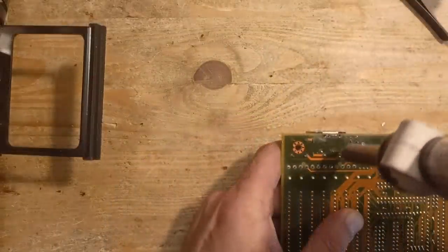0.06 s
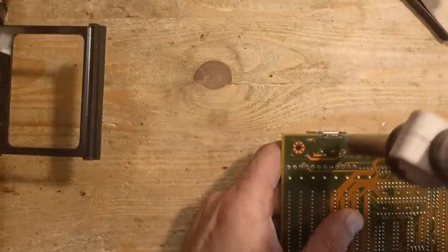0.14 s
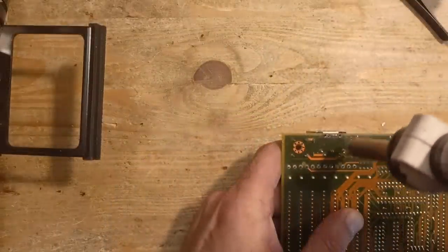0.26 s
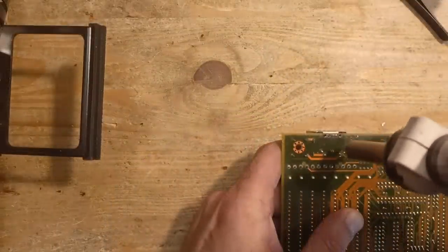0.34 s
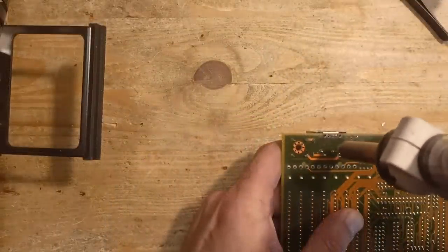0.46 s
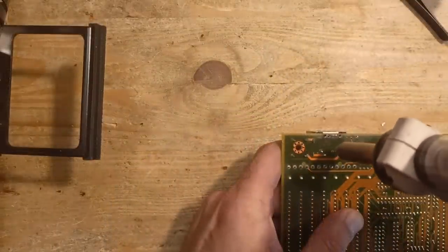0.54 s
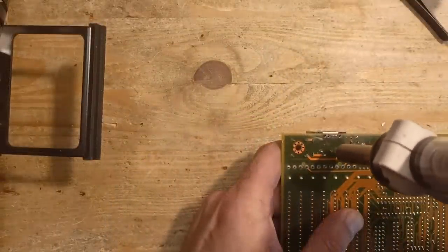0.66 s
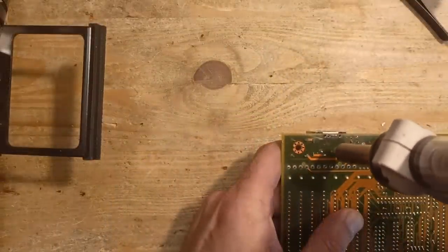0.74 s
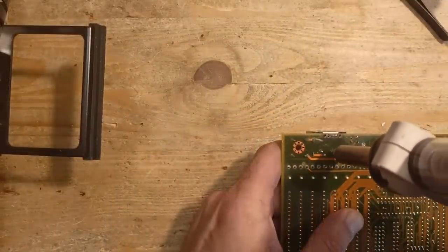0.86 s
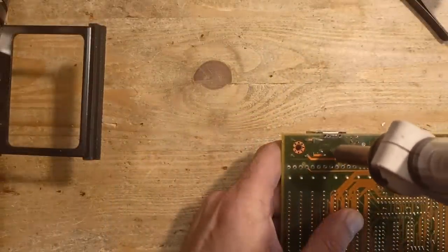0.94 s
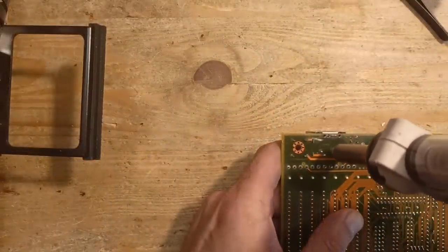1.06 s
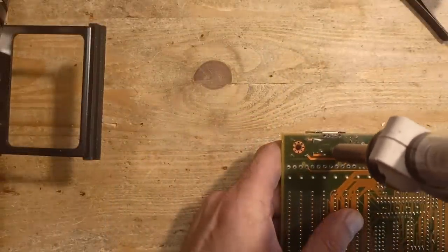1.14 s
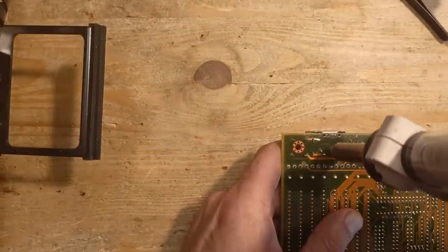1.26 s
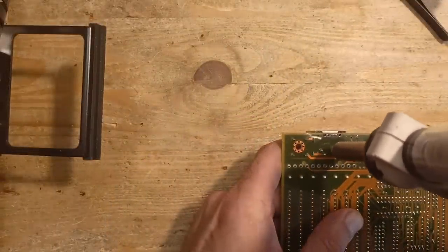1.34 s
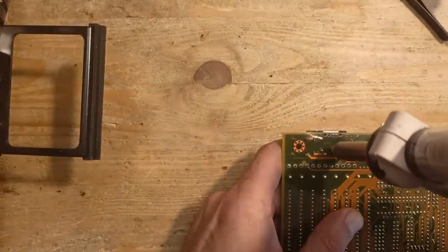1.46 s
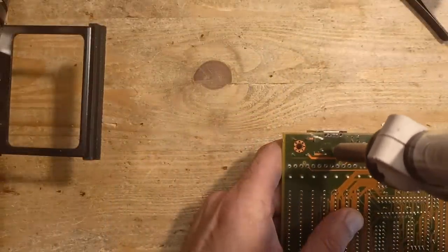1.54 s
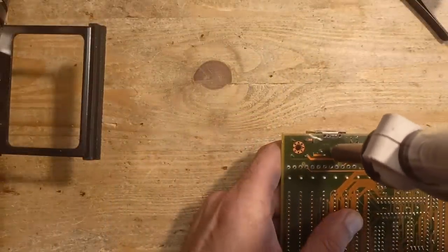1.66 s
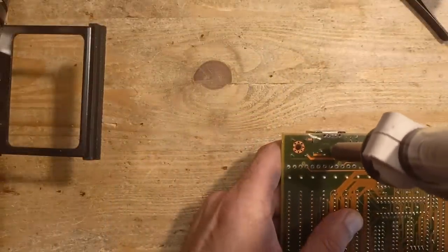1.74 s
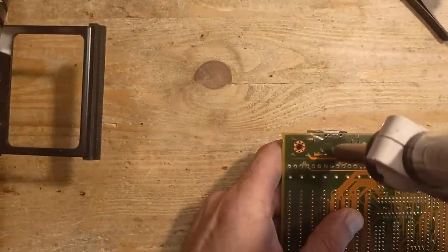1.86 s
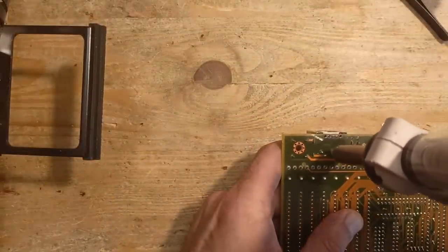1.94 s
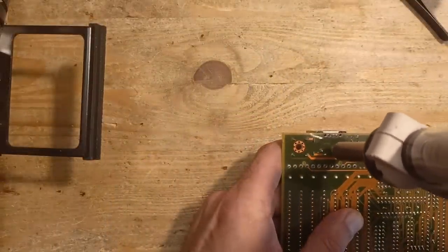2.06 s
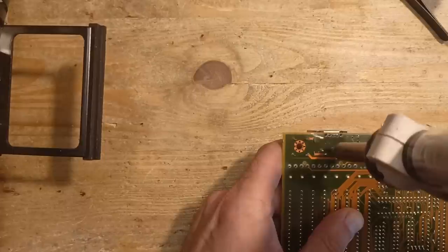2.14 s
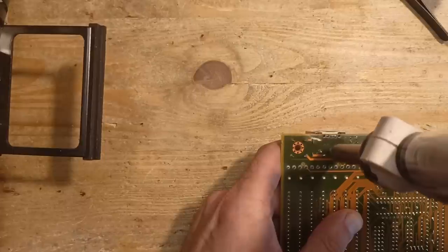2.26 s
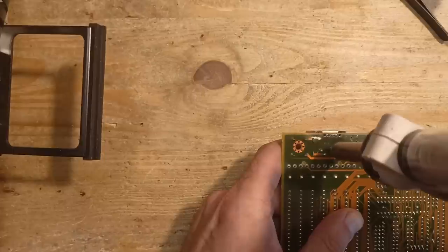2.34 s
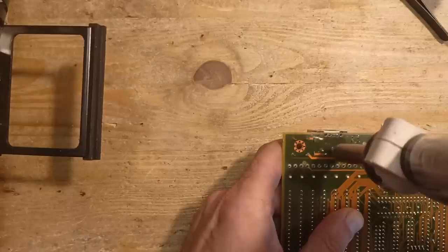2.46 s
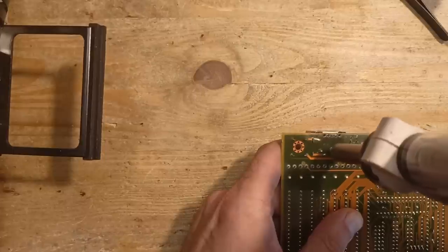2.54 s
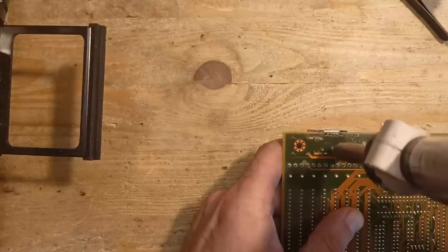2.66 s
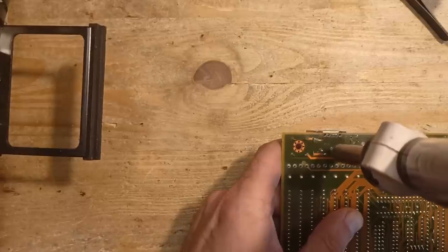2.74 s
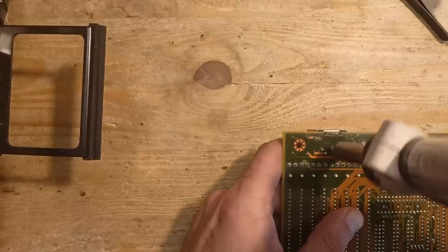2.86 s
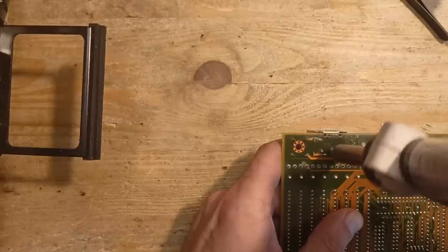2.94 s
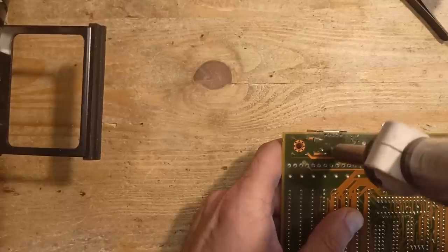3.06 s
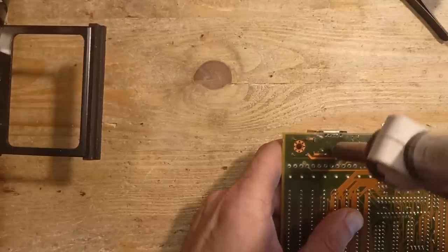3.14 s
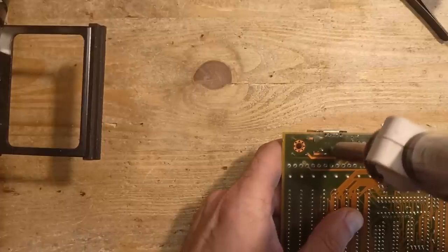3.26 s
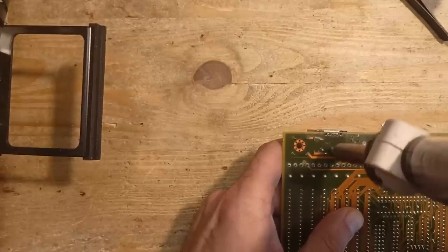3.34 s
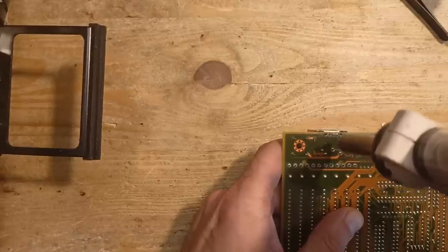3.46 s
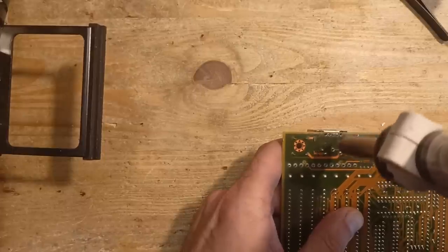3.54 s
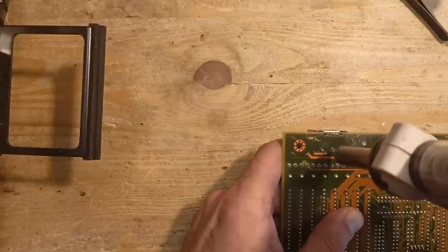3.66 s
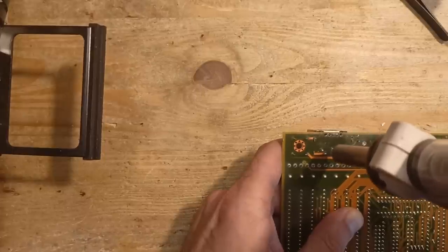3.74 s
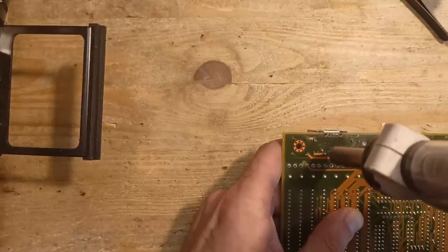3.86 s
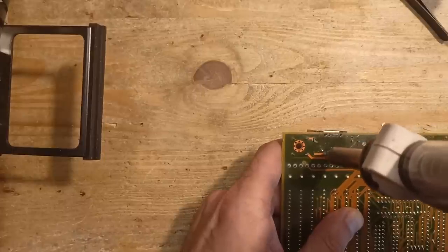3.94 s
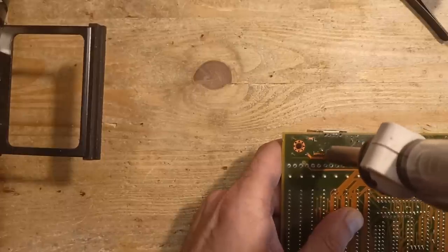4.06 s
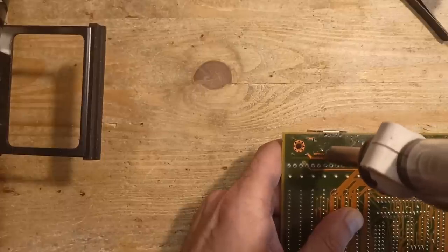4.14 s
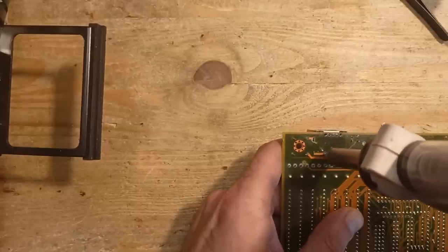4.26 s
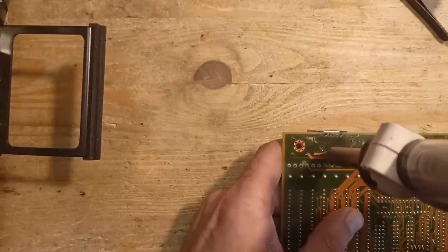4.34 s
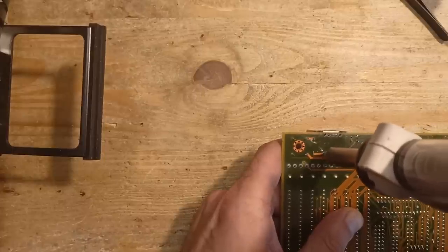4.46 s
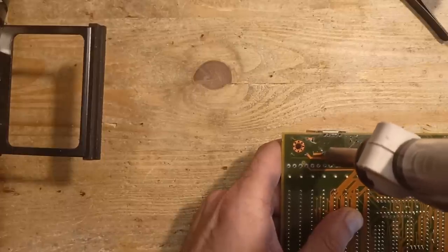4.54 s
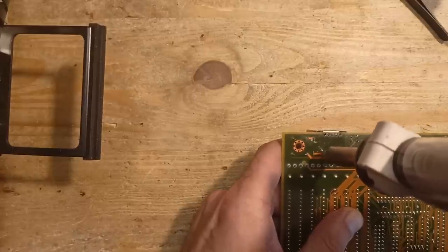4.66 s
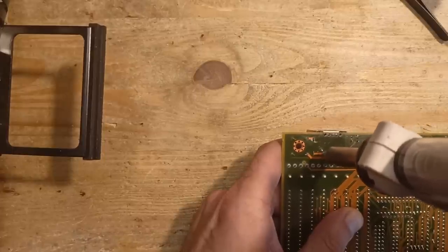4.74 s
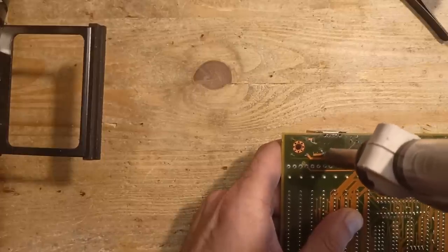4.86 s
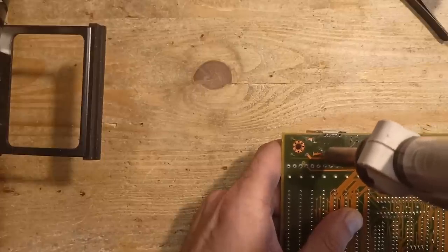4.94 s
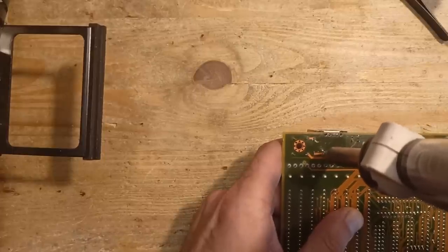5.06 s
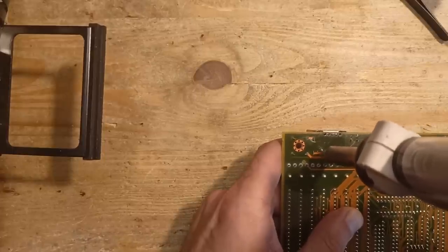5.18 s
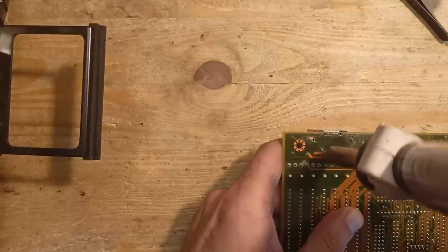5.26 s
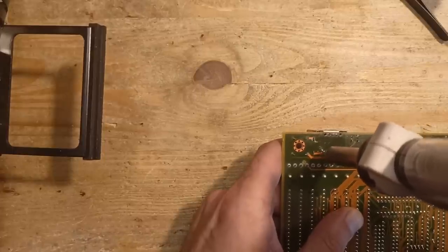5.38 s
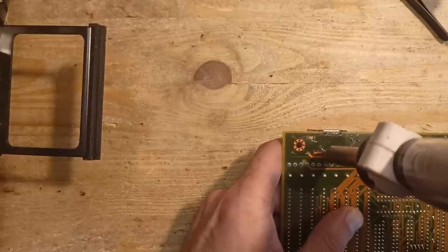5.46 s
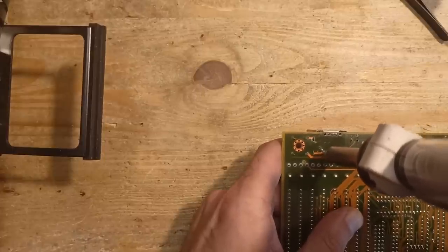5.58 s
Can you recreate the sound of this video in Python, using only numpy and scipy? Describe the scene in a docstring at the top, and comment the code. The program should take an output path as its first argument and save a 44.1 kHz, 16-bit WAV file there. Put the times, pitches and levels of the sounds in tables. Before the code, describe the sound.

A close recording at a workbench in a small room with a short tail and a soft, wavering low hum. It opens on an already running desoldering pump, a low buzzing motor drone with rattle and hiss, until a sharp trigger click at 0.16 s; the motor brakes abruptly and a softer click follows at 0.2 s. From about 0.8 to 2.65 s the metal tip makes faint ticks, gritty scrapes and small high squeaks on the board, busiest after 1.6 s. A light click at 2.68 s and a bright snap at 2.73 s start the pump, which spins up quickly and buzzes loudly, valves rattling, air hissing in surges, with wet, airy solder slurps strongest near 2.87 and 3.26 s. It stops at 3.48 s with a double click and rapid wind-down. Mostly quiet until 4.1 s, then sparse taps, thickening into scratches and faint squeaks from 4.9 s to the end.

```python
"""A desoldering gun on a wooden bench: its diaphragm pump runs, the trigger clicks and the pump winds down.
While it rests, the tip ticks, scrapes and squeaks on the board over a low room hum.
Then one full burst: the motor hums on its shaft orders, valves rattle, air hisses and solder slurps.
The trigger clicks, the pump winds down again and the tip returns to the board. All is shaped noise, sines and
decaying modes; a short room tail follows the pump noise, slurps, squeaks, clicks and tip touches."""
import sys
import numpy as np
from scipy import signal
from scipy.fft import rfft, irfft
from scipy.io import wavfile
from scipy.ndimage import uniform_filter1d

SR = 44100
rng = np.random.default_rng(int(sys.argv[2]) if len(sys.argv) > 2 else 0)


def waveform_to_disk(signal):
    """Save audio, clipped to [-1, 1], as 16-bit WAV at the path in sys.argv[1]."""
    frames = np.transpose(np.atleast_2d(signal))
    scaled = np.clip(frames, -1, 1) * 32767
    samples = np.round(scaled).astype(np.int16)
    wavfile.write(sys.argv[1], SR, samples)


N = 247401
T = np.arange(N) / SR
HZ = np.maximum(np.fft.rfftfreq(N, 1 / SR), 1)

# Modes of the board when struck. Each row: frequency in Hz, relative level in dB, t60 in s.
BOARD_MODES = [(840, -22, 0.033), (994, 4, 0.0093), (1354, 7.5, 0.013), (1614, 4.5, 0.014),
               (2470, -15, 0.013)]


def undb(db):
    """Turn decibels into an amplitude factor."""
    return 10 ** (np.asarray(db) / 20)


def unit(x):
    """Scale to rms 1."""
    return x / np.sqrt(np.mean(x ** 2))


def coloured(points, peaks=()):
    """Noise of rms 1 with a spectrum drawn through points and raised by resonant bumps."""
    point_hz, point_db = np.transpose(points)
    gain = undb(np.interp(np.log(HZ), np.log(point_hz), point_db))
    bumps = 1 + sum(undb(db) ** 2 / (1 + (2 * (HZ - hz) / width) ** 4) for hz, width, db in peaks)
    spectrum = rfft(rng.standard_normal(N)) * gain * np.sqrt(bumps)
    return unit(irfft(spectrum, N))


def walk(rate):
    """Random levels held 1 / rate s and slewed twice; spread near 1."""
    hold = int(SR / rate)
    steps = np.repeat(rng.standard_normal(N // hold + 1), hold)
    return 1.111 * uniform_filter1d(uniform_filter1d(steps, hold), hold)[:N]


def add(out, s, x):
    """Mix a short sound in at time s."""
    i = int(s * SR)
    out[i:i + len(x)] += x[:N - i]


def bandpass(x, edges, order):
    """Keep the band between two edges in Hz."""
    return signal.sosfilt(signal.butter(order, edges, "bandpass", fs=SR, output="sos"), x)


def puff(x, t60, rise_s):
    """Noise that starts fast and dies away; rms 0.5 before the envelope."""
    t = np.arange(len(x)) / SR
    return unit(x) / 2 * (1 - np.exp(-t / rise_s)) * 1000 ** (-t / t60)


def ring(modes, size):
    """The sum of decaying modes after one blow."""
    t = np.arange(size) / SR
    return sum(undb(db) * 1000 ** (-t / t60) * np.sin(2 * np.pi * hz * t) for hz, db, t60 in modes)


def struck(modes, noise, t60):
    """Modes shaken by a short rough contact; peak 1."""
    contact = puff(noise, t60, 0.0001)
    x = signal.fftconvolve(contact, ring(modes, size=len(noise)))[:len(noise)]
    return x / np.abs(x).max()


def motor_hum(turn, hz, on):
    """Sines on multiples of the shaft turn, thinner at low speed and held back by the bench."""
    # Strokes of the shaft. Each row: multiple of the shaft speed, dB above the hum level.
    orders = [(1, 0), (2, -1.5), (3, 5.5), (4, -6.5), (5, -16), (6, -14.5), (7, -16.5), (8, -23), (9, -43),
              (10, -21), (11, -23.5), (12, -12.5), (13, -30.5), (14, -20), (15, -27.5), (16, -18),
              (17, -23.5), (18, -34), (22, -21), (26, -24), (27, -27)]
    # Half orders, since alternate strokes differ. Each row: multiple of the shaft speed, dB above the hum level.
    half_orders = [(1.5, -32), (3.5, -15), (4.5, -19), (5.5, -22.5), (6.5, -26), (7.5, -26)]
    full_hz = 87.4  # shaft at full speed
    slow_db = 13  # lost per octave below full speed by order 3, and twice that from order 4 up
    bench_hz, bench_db = 83, 35  # the bench radiates little below this: dB lost per octave

    strokes = list(orders) + list(half_orders)
    live = np.flatnonzero(on)
    octaves = np.log2(hz[live] / full_hz)
    hum = np.zeros(N)
    for (k, db), chance in zip(strokes, rng.uniform(0, 2 * np.pi, len(strokes))):
        # the low orders lag with the square of their number; higher ones start at random phases
        lag = np.pi * k * k / 2 if k < 4 else chance
        # higher orders waver more
        level_db = db + min(.15 * k, 2.5) * walk(25)[live]
        level_db += slow_db * np.clip(k - 2, 0, 2) * octaves
        level_db += bench_db * np.minimum(np.log2(k * hz[live] / bench_hz), 0)
        hum[live] += undb(level_db) * np.sin(k * turn[live] + lag)
    return hum


def valve_rattle(turn):
    """Valves rattle the resonant housing, swelling four times a turn."""
    # Spectrum of the rattle. Each row: frequency in Hz, relative dB per Hz.
    rattle = [(30, -45), (60, -7), (120, -6.5), (230, 2.5), (550, -2), (1000, -5.5), (2000, -10.5),
              (2600, -22.5), (4000, -25)]
    # Resonances of the housing. Each row: frequency in Hz, width in Hz, dB above the spectrum.
    housing = [(548.3, 21, 11), (748.4, 22.4, 9.5), (917, 35, 7.5), (1040, 38, 3), (1580, 360, -2),
               (1920, 100, 2.5)]
    return coloured(rattle, housing) * (1 + 0.21 * np.sin(4 * turn)) * undb(1.24 * walk(90))


def air_hiss(turn, rattle_db, air_db, jet_db):
    """Hiss pulsing once a turn, in three bands that flicker separately but surge together."""
    # Spectrum of the hiss. Each row: frequency in Hz, relative dB per Hz.
    air_points = [(1180, -32.5), (2300, -7.5), (3400, -4), (5210, -7), (6630, -9), (8370, 2.5),
                  (10700, -19), (14900, -1), (15700, 1)]
    air_hz, jet_hz = 6600, 9480  # lower edges of the air and of the narrow jet

    spectrum = rfft(coloured(air_points) * (1 + 0.23 * np.sin(turn)))
    bands = (0, air_hz), (air_hz, jet_hz), (jet_hz, SR)
    valve, air, jet = (unit(irfft(spectrum * (HZ > lo) * (HZ <= hi), N)) for lo, hi in bands)
    hiss = undb(air_db + 3.2 * walk(120)) * air
    hiss += undb(jet_db + 2.5 * walk(99)) * jet
    # the lower hiss is valve noise: it swells with both the rattle and the air
    hiss += undb((rattle_db + air_db) / 2 - 5.5 + 2.0 * walk(70)) * valve
    return hiss


def pump():
    """The shaft runs up and is braked quickly, driving hum, rattle and hiss together."""
    # Pump bursts. Each row: trigger pressed in s, released in s.
    bursts = [(-.3, .156), (2.7246, 3.48)]
    # Hum, rattle, air and jet in turn. Each row: base level at full speed in dB, dB per octave of run-up,
    # hold after the release in s, then fade in dB per s.
    layers = [(-36, 11.5, 0.024, 300), (-43, 5.5, 0.045, 280), (-50.5, -0.5, 0.016, 239),
              (-47, 3, 0.0091, 207)]
    # Air surging through the nozzle. Each row: centre in seconds, dB above the steady air.
    surges = [(.13, 0), (2.87, 4.5), (3.03, 5), (3.1, 2.5), (3.19, 2), (3.27, 4.5), (3.41, 1.5), (3.47, 2)]
    full_hz, spin_up_s = 87.4, .047  # full shaft speed, time constant of the run-up
    brake_hz_per_s, run_on_s = 1000, .014  # braking after the release, and its delay
    fresh_db, fresh_s = 7, 0.16  # the hum is louder early in a burst, before the vacuum builds
    surge_s, jet_surge = 0.026, 2.3  # half width at 1/e; the jet swells this many times as much in dB

    starts = np.transpose(bursts)[0]
    pressed, released = np.transpose(bursts)[:, np.searchsorted(starts, T) - 1]
    since_press, since_release = T - pressed, T - released
    on = np.clip((.2 - since_release) / .01, 0, 1)
    speed = np.maximum(1 - np.exp(-since_press / spin_up_s), .01)  # share of full speed
    braking = brake_hz_per_s * np.maximum(since_release - run_on_s, 0)
    hz = np.maximum(full_hz * speed - braking, 10)
    turn = 2 * np.pi * np.cumsum(hz * (1 + 0.00068 * walk(31.05))) / SR

    hum_db, rattle_db, air_db, jet_db = (
        db + rise_db * np.log2(speed) - fade_db * np.maximum(since_release - hold, 0)
        for db, rise_db, hold, fade_db in layers)
    hum_db = hum_db + fresh_db * np.exp(-since_press / fresh_s)
    surge_db = sum(db * np.exp(-((T - s) / surge_s) ** 2) for s, db in surges)

    hum = undb(hum_db) * motor_hum(turn, hz, on)
    rattle = undb(rattle_db) * valve_rattle(turn)
    hiss = air_hiss(turn, rattle_db, air_db + surge_db, jet_db + jet_surge * surge_db)
    return on * hum, on * (rattle + hiss)


def whistles(rows, octaves, rise_s):
    """Short puffs of noise in a narrow band around a given pitch."""
    out, noise = np.zeros(N), rng.standard_normal((len(rows), 6000))
    for (s, db, hz, t60), x in zip(rows, noise):
        edges = hz * 2 ** (octaves * np.array([-.5, .5]))
        add(out, s, undb(db) * puff(bandpass(x, edges, 2), t60, rise_s))
    return out


def solder_slurps():
    """Solder slurping through the nozzle: puffs of noise at the pitch of its bore."""
    # Each row: start in seconds, level in dB.
    slurps = [(2.7866, -42.5), (2.8672, -35.5), (2.8988, -40), (2.985, -40.5), (3.02, -42.5),
              (3.249, -33.5), (3.2637, -32.5), (3.279, -37), (3.4016, -42.5)]
    bore_hz, t60_s = 5320, 0.097
    return whistles([(s, db, bore_hz, t60_s) for s, db in slurps], octaves=0.26, rise_s=0.0006)


def pin_squeaks():
    """Pins squeaking in the nozzle: puffs of noise, each at its own pitch."""
    # Each row: start in seconds, level in dB, pitch in Hz.
    squeaks = [(1.646, -50.5, 9750), (1.695, -57.5, 9300), (1.99, -51.5, 6800), (1.99, -62, 12900),
               (2.006, -55, 6360), (2.308, -53, 11700), (2.568, -55.5, 8500), (2.583, -55, 11600),
               (2.635, -59, 5330), (4.878, -57.5, 3370), (5.011, -56, 7440), (5.12, -62, 12300),
               (5.136, -56.5, 10900), (5.24, -56.5, 8660), (5.425, -56, 12900), (5.519, -57, 8400)]
    t60_s = 0.058
    return whistles([(s, db, hz, t60_s) for s, db, hz in squeaks], octaves=0.23, rise_s=0.00059)


def trigger():
    """The switch snaps, ringing its contacts and thudding into the board."""
    # Each row: start in seconds, snap level in dB, thud level in dB, t60 of the contact noise in s.
    clicks = [(0.1567, -22.5, -47, 0.01), (0.2, -36.5, -43, 0.017), (2.6758, -35.5, -41, 0.014),
              (2.7251, -23.5, -58, 0.025), (3.4801, -22.5, -49, 0.014), (3.5206, -27.5, -42, 0.021)]
    # Modes of the switch contacts. Each row: frequency in Hz, relative level in dB, t60 in s.
    switch_modes = [(4000, -17, 0.0025), (4600, -1.5, 0.0027), (5640, 0.5, 0.003), (7950, 4.5, 0.0036),
                    (13900, -2, 0.0023)]
    out, noise = np.zeros(N), rng.standard_normal((len(clicks), 2, 6000))
    for (s, db, thud_db, t60), (snap, dull) in zip(clicks, noise):
        bright = puff(np.diff(snap, prepend=0), t60, 0.00019)
        add(out, s, undb(db) * (struck(switch_modes, snap, t60) + bright))
        add(out, s, undb(thud_db) * struck(BOARD_MODES, dull, t60))
    return out


def tip():
    """Each touch is a gritty scratch and a thud that rings the board; faint grazes fall at random."""
    # Tip against the board. Each row: start in seconds, scratch level in dB, thud level in dB.
    placed = [(0.77, -64, -51.5), (0.9752, -67.5, -57), (1.0735, -65, -60), (1.0918, -68, -53),
              (1.3384, -63.5, -54.5), (1.5921, -59, -51.5), (1.6432, -59, -58), (1.695, -61, -58),
              (1.7278, -51.5, -52.5), (1.8175, -63, -53), (1.974, -55, -48), (1.9894, -58.5, -55),
              (2.0822, -62, -68), (2.139, -56, -56), (2.2928, -49, -44), (2.3237, -67, -49.5),
              (2.366, -61, -62), (2.5042, -55.5, -52.5), (2.578, -48.5, -48), (2.635, -58.5, -69),
              (4.079, -67.5, -49), (4.317, -58, -43.5), (4.4165, -67, -54.5), (4.447, -64.5, -72),
              (4.6845, -65, -51), (4.8767, -55.5, -53), (4.9354, -58.5, -55.5), (5.0091, -62, -54),
              (5.065, -61, -57), (5.134, -59.5, -63), (5.2114, -58.5, -62), (5.24, -57, -53.5),
              (5.3968, -53, -49), (5.4174, -70, -70), (5.5034, -60, -66), (5.5374, -63, -60)]
    # Spectrum of the scratch. Each row: frequency in Hz, relative dB per Hz.
    scratch = [(1500, -40), (2700, -4), (4000, -6.5), (5000, -6.5), (5800, -13.5), (8200, -6.5),
               (10700, -19), (13000, -17), (15000, -13)]
    grazes, graze_db, spread_db, graze_thud_db = 12, -69.5, 3, -65  # count, scratch, its spread, thud
    scratch_t60_s, thud_t60_s = 0.095, 0.034

    touches = list(placed)
    for when, u in rng.random((grazes, 2)):
        touches.append((when * N / SR, graze_db + spread_db * (2 * u - 1), graze_thud_db))
    grit = coloured(scratch) * undb(4 * walk(250))
    out, noise = np.zeros(N), rng.standard_normal((len(touches), 6000))
    for (s, db, thud_db), dull in zip(touches, noise):
        piece = np.roll(grit, -int(s * SR))[:6000]
        add(out, s, undb(db) * puff(piece, scratch_t60_s, 0.0018))
        add(out, s, undb(thud_db) * struck(BOARD_MODES, dull, thud_t60_s))
    return out


def room(x):
    """A small workshop: a dense, band-limited noise tail that dies away behind the sound."""
    t60_s, wet_db = 0.23, -11
    t = np.arange(int(.5 * SR)) / SR
    tail = rng.standard_normal(len(t)) * 1000 ** (-t / t60_s) * np.clip(t / 0.0019, 0, 1)
    tail = bandpass(tail, [300, 12000], 1)
    return x + undb(wet_db) * signal.fftconvolve(x, tail / np.linalg.norm(tail))[:N]


def room_tone():
    """Broad room noise with its resonances, and two hums that wander in pitch and level."""
    # Spectrum of the room noise. Each row: frequency in Hz, relative dB per Hz.
    noise_points = [(25, -57), (84, -20), (150, -22.5), (200, -23), (300, -18.5), (420, -33), (930, -33),
                    (1900, -40), (2250, -47.5), (5000, -50.5), (8300, -56), (9000, -58.5), (12500, -61),
                    (15200, -56)]
    # Resonances of the room noise. Each row: frequency in Hz, width in Hz, dB above the spectrum.
    noise_peaks = [(240, 36.8, 15.5), (347, 29, 5), (542, 23, 8), (781, 66, 7), (1080, 14, 9.5),
                   (1383, 31, 5), (1593, 44, 7), (1919, 35, 10.5), (2586, 51, 7), (7070, 50, 10),
                   (8200, 28, 12.5)]
    # Two wavering hums that beat. Each row: centre frequency in Hz, centre level in dB rms.
    tones = [(235, -59.5), (255, -59.5)]
    out = undb(-58.5) * coloured(noise_points, noise_peaks)
    for hz, db in tones:
        phase = 2 * np.pi * np.cumsum(hz + 5.044 * walk(9.9)) / SR
        out += undb(db + 0.66 * walk(7.4)) * np.sqrt(2) * np.sin(phase)
    return out


def scene():
    """Mix the gun and the board in the workshop, over the room tone."""
    hum, pump_noise = pump()
    near = pump_noise + solder_slurps() + pin_squeaks() + trigger() + tip()
    # the hum reaches the microphone mostly through the bench, so it skips the room
    return (hum + room(near) + room_tone())[None]


def record(dry):
    """The microphone chain cuts the top steeply above 15.5 kHz."""
    return signal.sosfilt(signal.ellip(10, .2, 75, 15500, fs=SR, output="sos"), dry)


dry = scene()
out = record(dry)
waveform_to_disk(out)
```